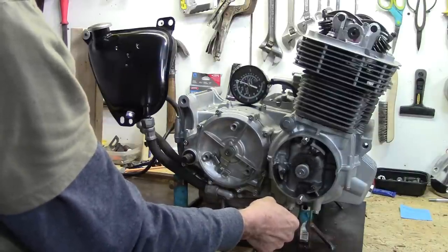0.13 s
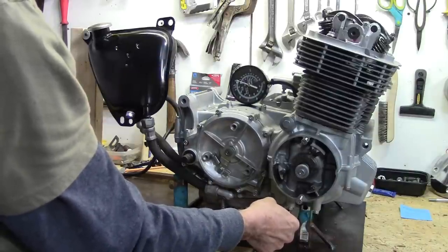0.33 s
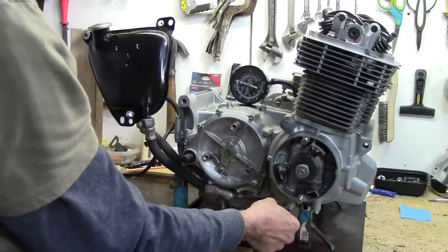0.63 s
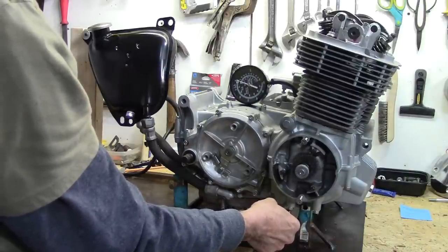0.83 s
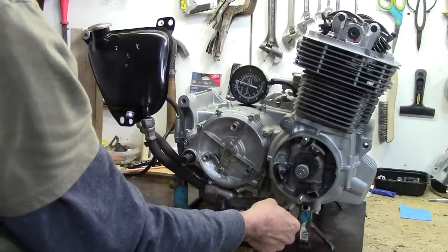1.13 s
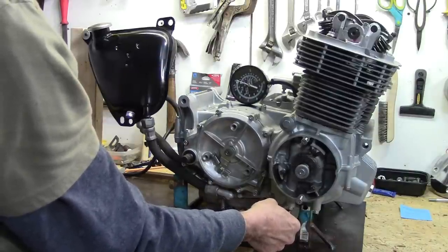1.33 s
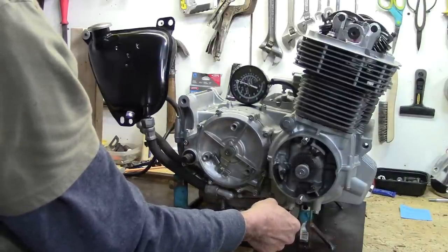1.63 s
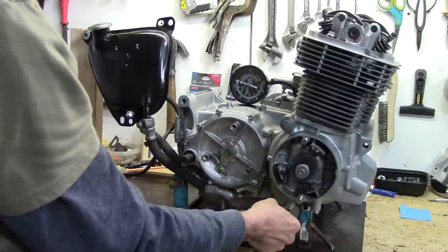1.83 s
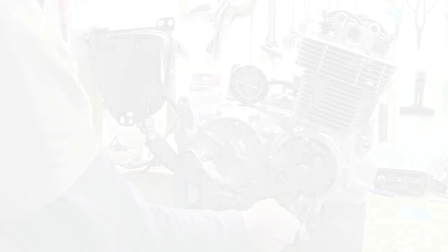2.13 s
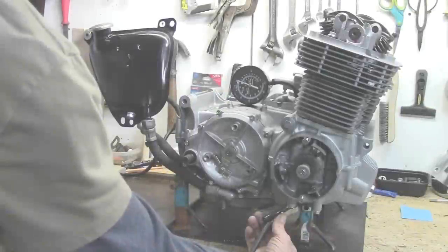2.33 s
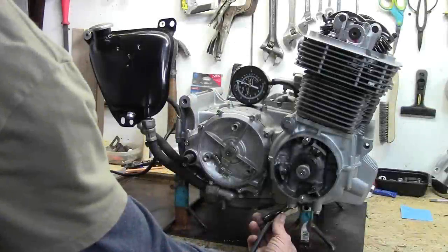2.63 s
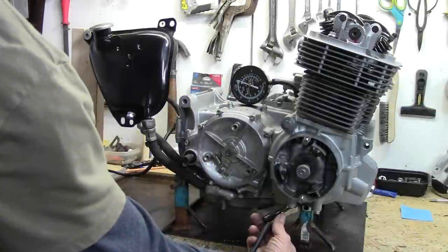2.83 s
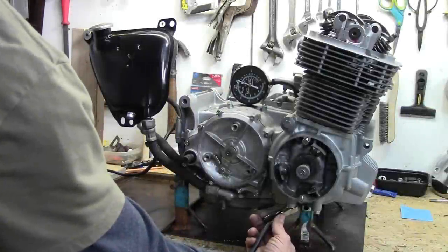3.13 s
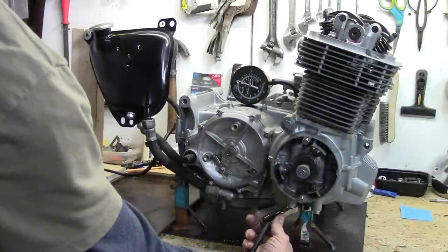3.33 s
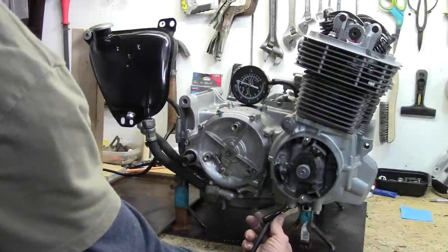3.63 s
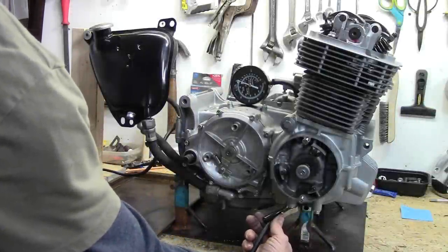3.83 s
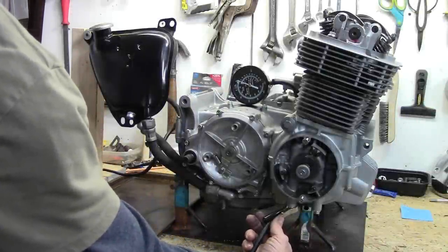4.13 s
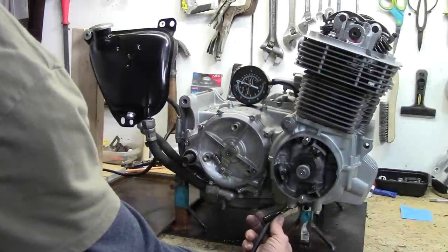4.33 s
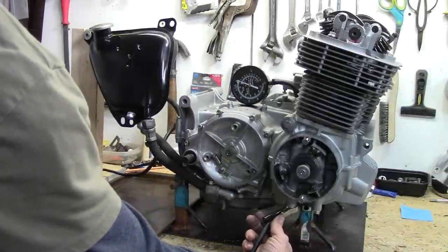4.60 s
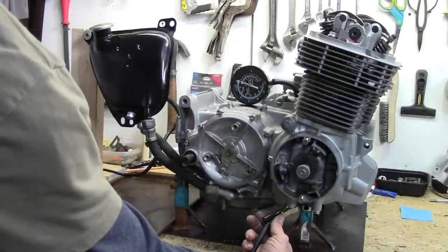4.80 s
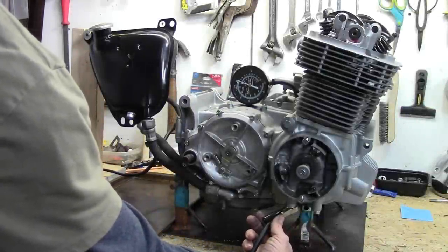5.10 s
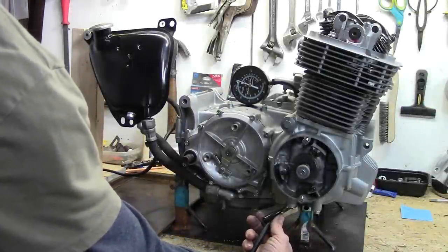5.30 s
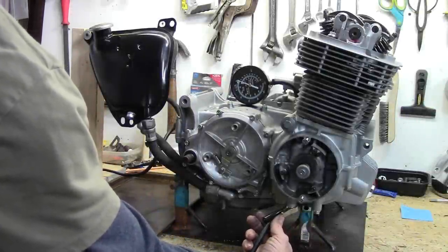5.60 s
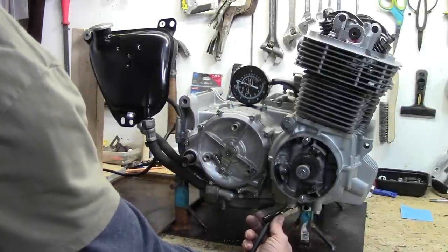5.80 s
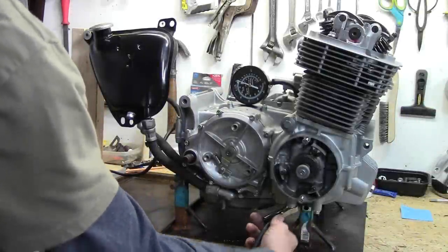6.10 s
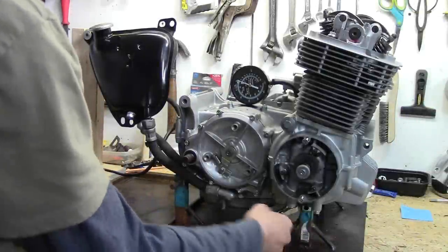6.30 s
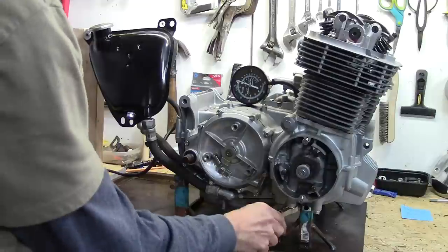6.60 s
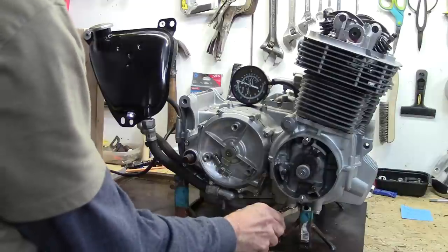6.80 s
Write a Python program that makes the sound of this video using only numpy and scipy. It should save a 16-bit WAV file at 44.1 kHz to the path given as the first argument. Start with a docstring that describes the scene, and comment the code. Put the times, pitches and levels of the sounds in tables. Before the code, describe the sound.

A starter motor cranks an engine without it firing, a steady metallic gear whine pulsing about seven times a second in a small workshop.

```python
"""An electric starter cranks a motorcycle engine on a workbench; the engine never fires.
Its reduction gears whine as sums of tooth tones; teeth and brushes grind as noise that pulses with each tooth.
About seven times a second the crank labours and runs free, so the whine swings and slack gears chatter as clicks.
Resonances stand for the alloy crankcase; a small room and low filtered-noise rumble surround it.
Early on, two stretches of cranking are joined, so the beat jumps once; near the end the starter picks up speed."""
import sys
import numpy as np
from scipy import signal
from scipy.fft import rfft, irfft
from scipy.io import wavfile

SR = 44100
rng = np.random.default_rng(int(sys.argv[2]) if len(sys.argv) > 2 else 0)


def store_pcm(level_fs):
    """Save levels as 16-bit WAV."""
    pcm = np.round(np.clip(level_fs, -1, 1) * 32767).astype(np.int16)
    wavfile.write(sys.argv[1], SR, np.atleast_2d(pcm).T)


N = 306530
TIME = np.arange(N) / SR  # s
HZ = np.fft.rfftfreq(N, 1 / SR)

# a stroke is one compression stroke of the piston; teeth are counted on the starter's pinion
TEETH_PER_STROKE = 110.3
PINION_TEETH, IDLER_TEETH = 10, 47  # teeth that pass in one turn of each gear
FIRST_STROKE = .092  # share of a stroke already done at the start
# when the second stretch takes over [s], share of a stroke that the beat jumps back
JOIN_S, JOIN_STROKES = 2.2, .127


def amp(db):
    """Turns decibels into a gain."""
    return 10 ** (np.asarray(db) / 20)


def evened(x):
    """Scales a signal to rms 1."""
    return x / np.sqrt(np.mean(x ** 2) + 1e-20)


def read(points, hz):
    """Reads between the points of a table, on a log-frequency axis."""
    f, value = np.transpose(points)
    return np.interp(np.log(hz + 1), np.log(f + 1), value)


def coloured(x, gain_db):
    """Filters with the given gain at each frequency, never answering before the sound arrives."""
    log_gain = np.log(amp(np.maximum(gain_db, -100)))
    # folding the cepstrum forward in time gives the filter its minimum phase
    cepstrum = irfft(log_gain, N)
    cepstrum[1:N // 2] *= 2
    cepstrum[N // 2 + 1:] = 0
    response = np.exp(rfft(cepstrum))
    return irfft(rfft(x) * response, N)


def resonances(x, table):
    """Lifts or dips the sound around each listed frequency."""
    gain_db = sum(db / (1 + (2 * (HZ - hz) / width) ** 2) for hz, width, db in table)
    return coloured(x, gain_db)


def band_db(centre_hz, width_hz):
    """Gain curve of a single band that falls away on both sides of its centre."""
    return -20 * np.log10(1 + (2 * (HZ - centre_hz) / width_hz) ** 2)


def wander(rate_hz, slowest_hz=1):
    """Smooth random drift of rms 1, mostly between the two given rates."""
    band = HZ / np.hypot(HZ, slowest_hz) / (1 + (HZ / rate_hz) ** 4)
    return evened(irfft(rfft(rng.standard_normal(N)) * band, N))


def cycle(turns, at=0):
    """A swing that peaks once a turn, at the given share of it."""
    return np.cos(2 * np.pi * (turns - at))


def clicks(per_s, spread_db):
    """Random impacts of uneven size and either sign, scaled to rms 1."""
    size = rng.choice([-1, 1], N) * amp(spread_db * np.minimum(rng.exponential(1, N), 4))
    happens = rng.random(N) < per_s / SR
    return evened(size * happens)


def after_join(over_s=.08):
    """Moves from 0 in the first stretch of cranking to 1 in the second."""
    return np.clip((TIME - JOIN_S) / over_s + .5, 0, 1)


def motion(swing=0.0434, lopsided=0.0043, jitter=.0035):
    """Counts strokes and teeth, and gives the pace against the usual; speed swings with each stroke."""
    # mean starter speed: (time [s], pinion tooth rate [Hz])
    speed = [(0.0, 775.7), (0.5, 764.0), (1.3, 770.5), (2.15, 767.2), (2.3, 778.0), (3.5, 784.1),
             (5.1, 792.8), (6.0, 798.8), (6.3, 849.6), (6.95, 858.3)]
    mean_hz = np.interp(TIME, *np.transpose(speed))
    steady_strokes = np.cumsum(mean_hz) / SR / TEETH_PER_STROKE
    strokes = FIRST_STROKE + steady_strokes - JOIN_STROKES * after_join()
    sway = swing * cycle(strokes) + lopsided * cycle(2 * strokes, at=-0.071)
    sway = sway + jitter * wander(rate_hz=38.5)
    teeth = np.cumsum(mean_hz * (1 + sway)) / SR
    pace = mean_hz / np.median(mean_hz)
    return strokes, teeth, pace


def overrun(strokes, pace, at=0.8, tight=1.3, firm_pace=1.17):
    """Slack, 0-1: the crank runs ahead of the starter once a stroke, but less so when it turns fast."""
    firmness = np.clip((firm_pace - pace) / (firm_pace - 1), 0, 1)
    return firmness * np.exp(tight * (cycle(strokes, at) - 1))


def gears(strokes, teeth, pace, slack, load_db=0.94, fade_db=3.5, pace_power=3.2, pace_tilt=0.19,
          runout=0.19, idler_db=0.03, flutter_db=2.5, slop=0.0059):
    """Tooth tones: louder under load, fading when slack, throbbing as pinion and idler turn off centre."""
    # gear tones: (multiple of the tooth rate [-], relative level [dB])
    # the fractions come from the second gear pair and its sidebands
    tones = [(.34, -59), (.68, -46), (1, -36.5), (1.36, -41.5), (1.69, -36.5), (2, -28.5), (2.32, -47),
             (3, -28), (4, -30.5), (5, -29), (6, -33.5), (7, -35), (8, -37.5), (10, -35), (11, -31.5),
             (13, -41.5)]
    # peaks and notches on the way from gear shafts to covers: (centre [Hz], width [Hz], lift [dB])
    shaft_path = [(525, 22, -3), (541, 22, 2), (580, 24, -7.5), (610, 25, 1), (746, 30, 5.5),
                  (806, 10.6, -7), (870, 28, -8.5), (908, 26, 16), (1528, 32, 3), (1613, 65, -5),
                  (1730, 55, 4), (2233, 110, 2.5), (2440, 170, -5.5), (2520, 56, 0.5), (3188, 120, -2),
                  (3330, 70, -3.5), (4105, 750, -2), (4410, 80, -4.5), (4830, 320, -3), (6400, 400, 3.5)]
    out = np.zeros(N)
    mesh = teeth + slop * (1 + slack) * wander(rate_hz=140)  # no two teeth meet exactly alike
    for multiple, db in tones:
        throb = 1 + runout * cycle(teeth / PINION_TEETH, rng.random())
        push = pace ** (pace_power - pace_tilt * multiple)  # at speed the low tones gain on the high ones
        flutter = amp(flutter_db * wander(rate_hz=42, slowest_hz=5.9))
        tone = cycle(multiple * mesh, rng.random())
        out += amp(db) * flutter * throb * push * tone
    stroke_db = load_db * cycle(strokes, at=0.075) - fade_db * slack
    force_db = stroke_db + idler_db * cycle(teeth / IDLER_TEETH, at=0.68)
    return resonances(np.sqrt(2) * out * amp(force_db), shaft_path)


def grinding(strokes, teeth, split_hz=6500, grit=0.29, bite_db=2, rasp_db=1.5, surge_db=1.0, idler_db=1.76):
    """Scraping and tiny impacts burst at each tooth; the fizz surges after each rush and once an idler turn."""
    # colour of sliding teeth, bearings and brushes: (frequency [Hz], filter gain [dB])
    grind_colour = [(70.0, -61), (130.0, -37.5), (250.0, -35), (430.0, -26.5), (700.0, -25), (1000.0, -20),
                    (1500.0, -10), (2500.0, -13.5), (3500.0, -19), (5000.0, -21), (8500.0, -13.5),
                    (10500.0, -24), (12500.0, -28), (14200.0, -40)]
    rub = evened(rng.standard_normal(N) + grit * clicks(per_s=3000, spread_db=-6))
    rub = evened(rub * amp(bite_db * cycle(teeth) + rasp_db * cycle(2 * teeth)))
    # the scrape lies below the split and the fizz above it
    scrape = irfft(rfft(rub) / (1 + (HZ / split_hz) ** 8), N)
    fizz = rub - scrape
    scrape_db = 1.1 * cycle(strokes, at=0.78) + 0.27 * wander(rate_hz=14, slowest_hz=7)
    fizz_db = surge_db * cycle(strokes, at=.18) + .35 * wander(rate_hz=40)
    fizz_db = fizz_db + idler_db * cycle(teeth / IDLER_TEETH, at=.57)
    return coloured(scrape * amp(scrape_db) + fizz * amp(fizz_db), read(grind_colour, HZ))


def chatter(strokes, slack, centre_hz=1240, width_hz=210, level_db=-31.0, slack_db=10, lead_db=5):
    """As the crank starts to run free the unloaded teeth knock about in their slack."""
    knock_db = slack_db * slack + lead_db * cycle(strokes, at=0.88)
    knocks = clicks(per_s=1800, spread_db=1.0) * amp(knock_db)
    return amp(level_db) * evened(coloured(knocks, band_db(centre_hz, width_hz)))


def room(x):
    """Dense reflections from bench and walls, dying away at a different pace in each band."""
    # workshop reverberation: (frequency [Hz], time to fall by 60 dB [s])
    decay_times = [(200, 0.69), (1500, 0.18), (5000, 0.15), (12000, 0.13)]
    taps = rng.standard_normal(SR // 2) * (rng.random(SR // 2) < .1)
    taps[:SR // 300] = 0  # a short gap before the first reflection
    hz, t, z = signal.stft(taps, SR, nperseg=256)
    decay = amp(-60 * t / read(decay_times, hz)[:, None])
    tail = signal.istft(z * decay, SR, nperseg=256)[1]
    return irfft(rfft(x) * rfft(tail / np.linalg.norm(tail), N), N)


def rumble(drone_hz=118, width_hz=40, drone_db=-63):
    """Low workshop rumble from filtered noise; a faint drone lies under the second stretch of cranking."""
    # colour of the rumble: (frequency [Hz], filter gain [dB])
    rumble_colour = [(8, -10.5), (25, -38), (40, -37), (60, -54), (130, -73), (300, -69), (1000, -82)]
    floor = coloured(rng.standard_normal(N), read(rumble_colour, HZ))
    drone = evened(coloured(rng.standard_normal(N), band_db(drone_hz, width_hz)))
    return floor + amp(drone_db) * after_join() * drone


def scene(whine_db=0.0, grind_db=-0.16, drive_db=-1.5, direct_db=0.5, wet_db=-9.5, balance_db=0.19):
    """The cranking engine close in front, in a small room."""
    # resonances of crankcase and covers: (centre [Hz], width [Hz], lift [dB])
    case = [(241, 28, 9.5), (330, 54, 7), (483, 36, 9.5), (547, 52, 12), (600.6, 36, 12), (765, 9.6, 9.5),
            (845, 140, 3.5), (1043, 56, 8.5), (1354, 18, 6), (1375, 52, 9), (1514, 15, 4), (1588, 60, 9),
            (1590, 47, 2), (2185, 210, 6.5), (2610, 26, 6.5), (2817, 93, 8.5), (2980, 84, 3.5),
            (3036, 110, 6), (3257, 116, 7.5), (3550, 47, 7.5), (3768, 91, 8.5), (3830, 200, 6),
            (3957, 37, 1), (4426, 320, 7), (5460, 59, 12), (5700, 40, 4.6), (6520.0, 55, 8.5),
            (8790, 73, 9), (9250, 44, 11), (10380, 185, 12)]
    # difference between the two microphones: (frequency [Hz], side against mid [dB])
    stereo_width = [(25, -30), (60, -12), (125, -9), (250, -18.5), (500, -26), (1100, -26.5), (1750, -26.5),
                    (2600, -23.5), (4000, -20), (9000, -15.5), (12000, -31.5)]
    strokes, teeth, pace = motion()
    slack = overrun(strokes, pace)
    whine = amp(whine_db) * gears(strokes, teeth, pace, slack)
    grind = amp(grind_db) * grinding(strokes, teeth)
    drive = whine + grind + chatter(strokes, slack)
    engine = amp(drive_db) * resonances(drive, case)
    mid = amp(direct_db) * engine + amp(wet_db) * room(engine) + rumble()
    side = coloured(room(mid), read(stereo_width, HZ))
    left = (mid + side) / amp(balance_db)
    right = (mid - side) * amp(balance_db)
    return np.array([left, right])


def record(dry, ceiling=0.78, edge_hz=14900):
    """The recorder rounds off the highest peaks and cuts the treble above its edge."""
    rounded = dry / (1 + (dry / ceiling) ** 8) ** (1 / 8)
    lowpass = signal.firwin(511, edge_hz, window=("kaiser", 9), fs=SR)
    return signal.oaconvolve(rounded, lowpass[None], "same")


dry = scene()
out = record(dry)
store_pcm(out)
```